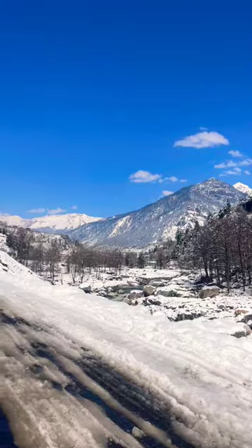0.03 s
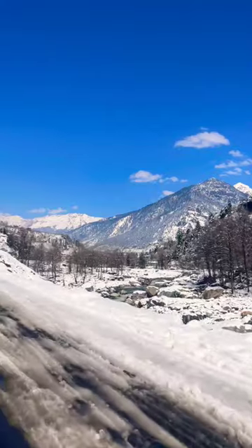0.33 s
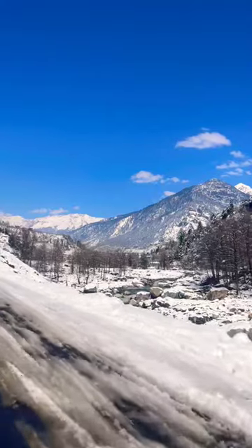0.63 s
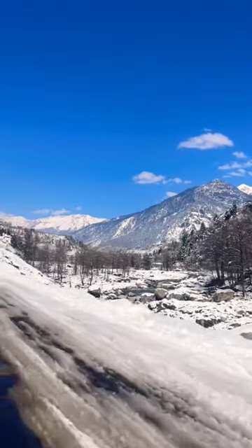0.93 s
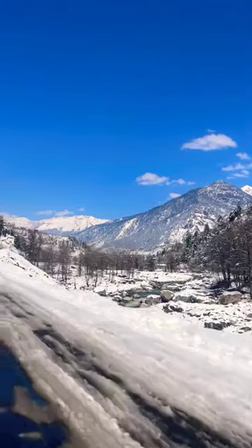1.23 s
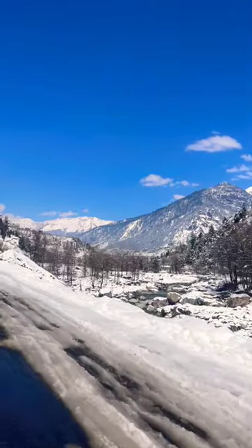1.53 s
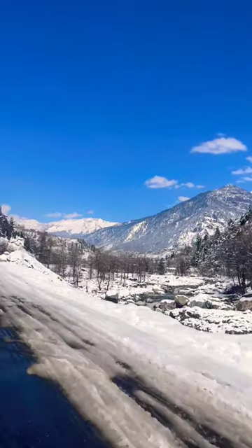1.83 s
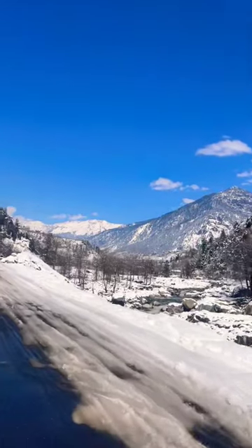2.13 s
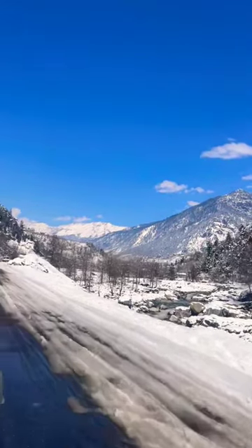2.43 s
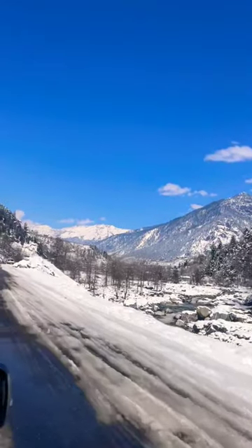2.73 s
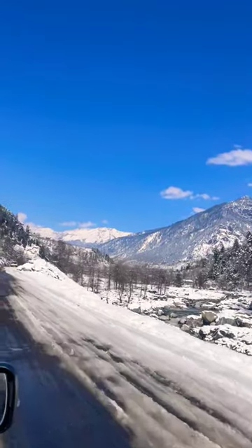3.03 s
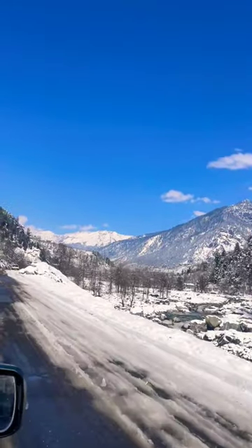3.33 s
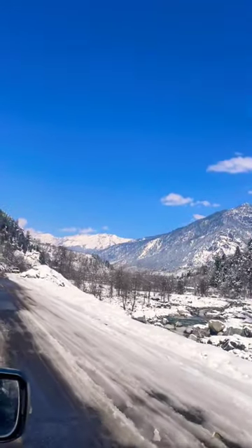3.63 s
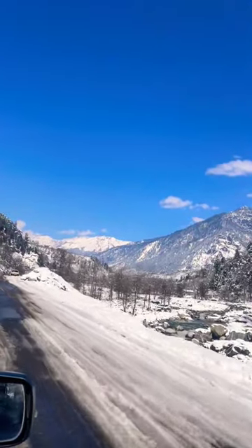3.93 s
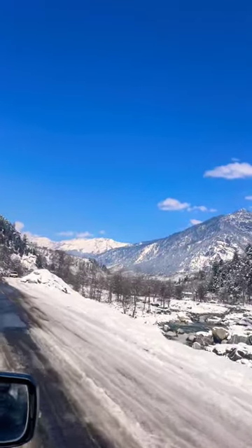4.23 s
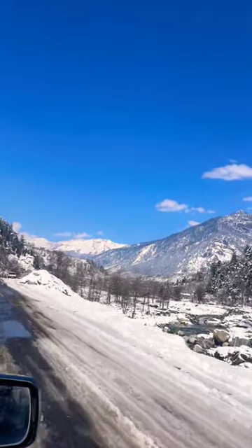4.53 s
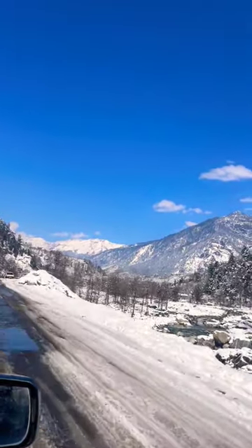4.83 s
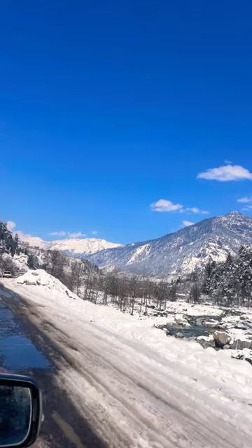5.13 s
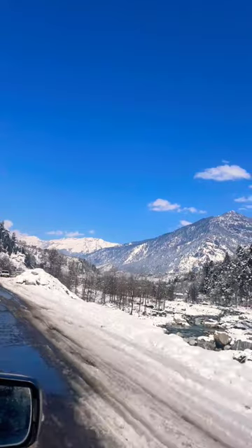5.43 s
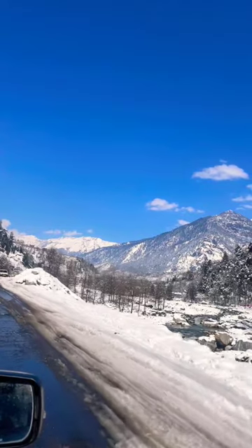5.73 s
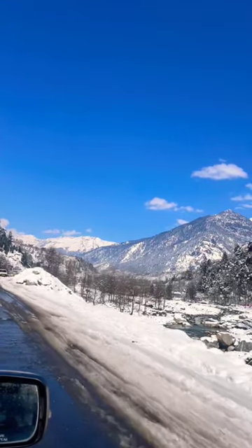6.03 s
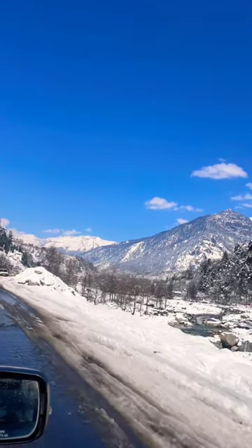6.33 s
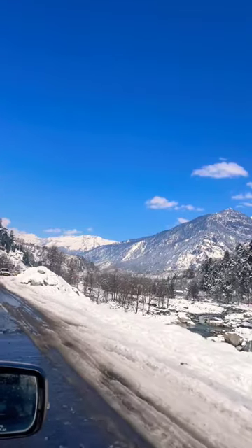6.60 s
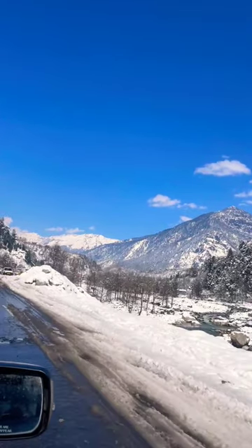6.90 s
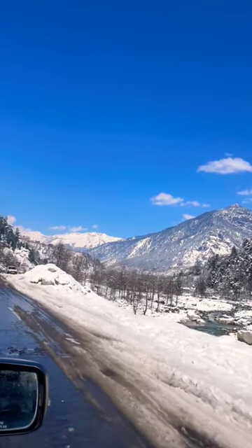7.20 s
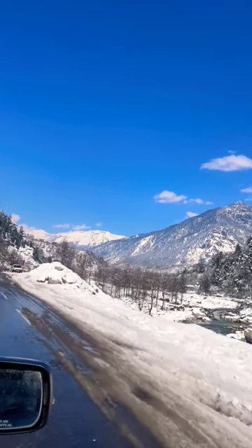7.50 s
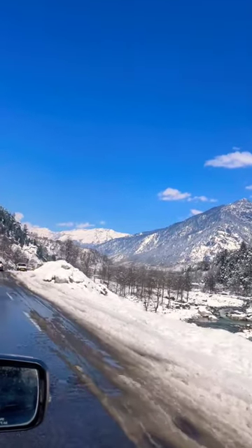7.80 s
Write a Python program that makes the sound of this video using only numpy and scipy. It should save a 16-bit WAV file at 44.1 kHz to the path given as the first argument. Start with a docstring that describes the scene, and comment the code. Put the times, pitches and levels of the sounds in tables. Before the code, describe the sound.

Wind rumbles, flutters and thumps on the microphone while a car drives along a wet, slushy road, its tyres swishing underneath.

```python
"""Wind at a car window on a slushy road

A phone is held at the open window of a car driving along a wet mountain road. Wind rumbles,
flutters and drops away on its two microphone ports; single eddies thump or crack as they sweep past.
Underneath, the engine drones, the tyres roar and the slush they throw up hisses and spatters."""
import sys
import numpy as np
from scipy import signal
from scipy.fft import rfft, irfft
from scipy.io import wavfile
from scipy.ndimage import uniform_filter1d

SR = 44100
rng = np.random.default_rng(int(sys.argv[2]) if len(sys.argv) > 2 else 0)


def transcribe(signal):
    """Save signal, clipped to [-1, 1], as a 16-bit WAV file at the path in sys.argv[1]."""
    frames = np.atleast_2d(signal).T
    limited = np.clip(frames, -1, 1)
    pcm = np.round(limited * 32767).astype(np.int16)
    wavfile.write(sys.argv[1], SR, pcm)


N = 346626
TIME = np.arange(N) / SR
FREQS = np.fft.rfftfreq(N, 1 / SR)

# gusts that hit the microphone head-on: t/s, leading eddy/dB, its pitch/Hz, buffet/dB, rumble/dB
GUSTS = [(0.182, -7.5, 119, -30, -14), (0.301, -35, 320, -30, -31), (0.39, -18.5, 304, -30.5, -22.5),
         (0.645, -14, 370, -27, -34), (0.922, -23, 406, -30, -34), (0.945, -25, 368, -31.5, -34),
         (1.046, -20, 450, -32, -36), (1.061, -14, 345, -28.5, -19.5), (1.12, -13.5, 325, -39, -32),
         (1.154, -20, 398, -26.5, -37), (1.334, -24, 400, -33, -30), (1.393, -10, 290, -24.5, -18),
         (1.44, -16.5, 250, -28, -22), (1.469, -9, 385, -34, -21), (1.636, -16.5, 327, -30.5, -42),
         (1.678, -21.5, 414, -41, -37), (1.708, -20, 473, -31, -20.5), (1.745, -21, 248, -37, -25),
         (1.783, -13, 577, -36, -32), (1.789, -16, 338, -31, -34), (1.817, -11.5, 467, -25.5, -32),
         (1.853, -22, 420, -46, -24), (1.881, -10.5, 385, -25, -30), (1.986, -21, 480, -43, -30),
         (2.007, -10.5, 224, -31, -22), (2.085, -16.5, 420, -46, -34), (2.116, -8.5, 386, -26, -34),
         (2.13, -7, 347, -26.5, -23), (2.21, -25, 450, -35, -26), (2.367, -19, 347, -33, -18),
         (2.403, -24, 400, -31.5, -34), (2.439, -16, 796, -32, -23), (2.534, -13.5, 427, -30.5, -19),
         (2.576, -20, 523, -30, -20), (2.631, -12, 390, -23, -38), (2.708, -14.5, 383, -26, -19),
         (2.732, -10, 280, -28, -31), (2.749, -13, 448, -33, -40), (2.795, -12.5, 445, -25, -38),
         (2.847, -20, 450, -35, -25), (2.898, -14, 310, -28.5, -35), (3.025, -15.5, 367, -28.5, -21),
         (3.099, -19, 448, -31, -30), (3.127, -14.5, 300, -23.5, -30), (3.206, -14, 400, -38, -20),
         (3.241, -19, 395, -34, -36), (3.281, -17, 420, -28, -18.5), (3.367, -10, 580, -27, -33),
         (3.5, -26, 420, -38, -18), (3.541, -20, 397, -33, -42), (3.623, -11, 360, -28, -14),
         (3.762, -21, 406, -31, -24), (3.788, -13.5, 460, -36, -20), (3.805, -18, 430, -32, -32),
         (3.887, -14.5, 347, -29.5, -25), (3.947, -23, 350, -30, -39), (4.019, -20, 400, -35, -42),
         (4.058, -22, 340, -27.5, -28), (4.122, -24, 240, -41, -30), (4.165, -20, 400, -39, -27),
         (4.184, -21, 423, -28, -26), (4.355, -16, 393, -34, -33), (4.489, -20, 385, -30.5, -28),
         (4.55, -18.5, 260, -35, -31), (4.607, -19, 376, -30, -29), (4.631, -9, 396, -39, -16.5),
         (4.649, -9, 296, -31, -26), (4.663, -10, 400, -28, -28), (4.817, -18.5, 360, -32, -18.5),
         (4.858, -13.5, 454, -27, -36), (4.894, -22, 400, -31, -18.5), (4.954, -28, 414, -28.5, -23),
         (5.151, -12, 377, -27, -18.5), (5.214, -18, 280, -27, -25), (5.379, -19.5, 240, -42, -32),
         (5.474, -15.5, 454, -32, -25), (5.54, -17, 398, -34, -35), (5.552, -10, 410, -26, -31),
         (5.585, -13, 360, -46, -30), (5.692, -19.5, 280, -47, -30), (5.794, -13, 313, -29, -23.5),
         (5.887, -20, 238, -43, -22), (5.96, -17, 384, -29, -34), (5.977, -13, 290, -31, -24),
         (6.093, -17, 216, -40, -35), (6.225, -16, 260, -37, -23.5), (6.286, -15, 493, -39, -35),
         (6.298, -17.5, 350, -31, -23), (6.358, -19, 385, -38, -43), (6.473, -16, 223, -37, -27),
         (6.518, -19, 400, -31.5, -24), (6.769, -19.5, 400, -50, -43), (7.099, -17.5, 333, -27.5, -27),
         (7.128, -14, 380, -29, -28), (7.612, -18, 250.5, -34, -20.5), (7.646, -13, 300, -30.5, -22),
         (7.771, -13.5, 280, -28.5, -24), (7.793, -21, 357, -37, -32)]


def wind():
    """Rumble and buffeting swell in gusts on both ports; side swirls flutter between the two."""
    airflow = [(.2, -36.5), (.8, -32), (1.5, -24.5), (2.3, -30.5), (2.65, -35), (3.0, -25.5), (3.7, -30.5),
               (4.1, -26.5), (4.8, -29), (5.3, -35), (6.05, -28), (6.8, -31.5), (7.5, -32), (7.86, -29)]  # the stream past the window between gusts: t/s, level/dB
    swirls = [(.21, -22), (.42, -24.5), (.72, -27), (1.03, -32), (1.19, -26), (1.37, -22), (1.44, -27),
              (1.53, -29), (1.74, -24), (1.91, -31), (2.0, -30), (2.29, -30), (2.43, -22.5), (2.57, -26),
              (2.74, -25), (2.88, -22), (3.0, -27), (3.16, -25), (3.32, -25), (3.71, -24), (3.83, -26),
              (4.0, -28), (4.11, -23), (4.27, -26), (4.5, -29), (4.711, -27), (5.381, -29), (5.91, -30),
              (6.1, -30), (6.47, -29), (7.21, -30), (7.359, -28)]  # swirls from the side: t/s, level/dB
    rumble_eq = [(15, -30), (28, -35), (42, -2.5), (58, 1), (80, -2), (110, -5), (160, -13), (300, -37),
                 (600, -105)]  # large, slow eddies: f/Hz, level/dB
    buffet_eq = [(50, -33), (110, -8), (170, 1.5), (250, -0.5), (420, -6.5), (700, -21), (1200, -24),
                 (2200, -42)]  # mid-sized eddies: f/Hz, level/dB
    flutter_eq = [(25, -15), (65, 7), (120, 0), (380, 1), (600, 0.5), (850, -7), (1050, -3), (1350, -14),
                  (2000, -16), (4000, -50)]  # churn between the ports: f/Hz, level/dB
    air_db, = curves(airflow)
    front_db = air_db + lulls_db()
    side_db = air_db.mean() + 0.73 * (air_db - air_db.mean())
    # small eddies arrive first and the large, slow ones trail behind
    times, _, _, buffet_db, rumble_db = np.transpose(GUSTS)
    buffet_power = swells(times, buffet_db + 1.5, lag_s=0.0023, rise_s=0.016, fall_s=0.008)
    rumble_power = swells(times, rumble_db - 3.06, lag_s=0.0055, rise_s=0.0094, fall_s=0.051)
    swirl_times, swirl_db = np.transpose(swirls)
    swirl_power = swells(swirl_times, swirl_db - 2, lag_s=0.0028, rise_s=0.023, fall_s=0.028)
    rumble_level = gusting(front_db - 2, rumble_power, lump_hz=25.5)
    buffet_level = gusting(front_db - 7, buffet_power, lump_hz=16.4)
    flutter_level = gusting(side_db - 6.5, swirl_power, lump_hz=9.6)
    rumble = steadied(coloured(rng.standard_normal(N), rumble_eq), 0.055) * rumble_level
    buffet = steadied(coloured(swarm(per_s=700, spread_db=5.5), buffet_eq), 0.083) * buffet_level
    shared = rumble + buffet + tearing(buffet_level)
    churn = swarm(per_s=1100, spread_db=0) + .5 * rng.standard_normal(N)
    flutter = steadied(coloured(churn, flutter_eq), 0.025) * flutter_level
    return np.array([shared + flutter, shared - flutter])


def gusting(stream_db, gust_power, lump_hz):
    """Wind envelope: gusts ride on a lumpy stream that dips freely but swells only so far."""
    lumps_db = 5 * np.minimum(wander(lump_hz), 1.26)
    return np.sqrt(gain_of(stream_db + lumps_db) ** 2 + gust_power)


def lulls_db(width_s=0.017, slack_db=-4):
    """The air drops away from the microphone for a moment, and slackens just before each gust."""
    lulls = [(.36, -10), (.73, -23), (.84, -5), (1.23, -3), (1.42, -12), (1.495, -1), (1.6, -6),
             (1.93, -16), (2.05, -10), (2.28, -21), (2.5, -6), (2.67, 3), (2.93, -4), (3.0, -4),
             (3.18, -12), (3.45, -15), (3.91, -14), (4.0, -6), (4.3, -8), (4.4, 1.5), (4.76, -6),
             (5.02, -9), (5.07, -7), (5.27, -5), (5.53, -6), (5.62, -6), (5.85, -4), (5.93, 0), (6.19, 0),
             (6.255, -6), (6.34, -14), (6.4, -5), (6.67, -13), (6.8, -20), (6.92, -4), (7.52, -8)]  # dips in the airflow, and the odd lift: t/s, change/dB
    dips_db = sum(db * np.exp(-((TIME - s) / width_s) ** 2) for s, db in lulls)
    times = np.transpose(GUSTS)[0]
    before_gust = swells(times, np.zeros(len(times)), lag_s=-0.0457, rise_s=0.0037, fall_s=0.0045)
    return dips_db + slack_db * np.minimum(before_gust, 1)


def tearing(buffet_level, steepness=2.28):
    """Hard gusts break into smaller eddies, so they sound brighter."""
    tearing_eq = [(250, -20), (480, -12), (700, -0.5), (950, -10), (1250, -11), (2200, -19)]  # small eddies: f/Hz, level/dB
    texture = steadied(coloured(swarm(per_s=1600, spread_db=-2.5), tearing_eq), 0.047)
    return texture * gain_of(-37) * (buffet_level / gain_of(-24)) ** steepness


def thumps(lean=0.25, trail_hz=145, trail_s=0.00861, scatter=0.31):
    """A quick eddy leads each gust and a slow one trails it, both a little nearer one port."""
    out = np.zeros((2, N))
    for s, db, hz, buffet_db, _ in GUSTS:
        phase, trail_phase, side, girth = rng.random(4)
        stretch = np.exp(scatter * (2 * girth - 1))  # a larger trailing eddy is lower and later
        lead = gain_of(db - 3.5) * eddy(hz, phase, cycles=0.75, slowing=0.36)
        trail = 2 * gain_of(buffet_db + 2) * eddy(trail_hz / stretch, trail_phase, slowing=0.48)
        start = s - len(lead) / SR / 2
        for port, sign in zip(out, (1, -1)):
            share = 1 + sign * lean * (2 * side - 1)
            add(port, start, lead * share)
            add(port, start + trail_s * stretch, trail * share)
    return out


def lone_eddies(thud_hz=85):
    """The sharpest vortices crack as they break on the ports; the largest pass as a deep thud."""
    cracks = [(1.389, -20, 820), (1.467, -14.5, 750), (1.882, -27, 850), (2.002, -22, 900),
              (2.127, -19, 740), (2.706, -24, 930), (2.749, -25, 1090), (2.793, -22, 935),
              (3.367, -23, 940), (5.552, -32, 800)]  # sharp eddies: t/s, peak/dB, f/Hz
    thuds = [(0.201, -12), (.301, -20.5), (0.656, -15), (1.572, -18.5), (2.237, -15), (2.317, -17.5),
             (2.462, -15), (2.586, -16), (2.826, -20), (2.862, -14), (2.961, -21), (3.137, -14),
             (3.222, -14), (3.334, -20.5), (3.708, -15), (3.854, -18), (4.557, -26), (5.493, -15.5),
             (5.816, -21.5), (6.043, -17), (7.038, -17)]  # large, slow eddies: t/s, peak/dB
    vortices = [(s, db, hz, 1.15) for s, db, hz in cracks] + [(s, db, thud_hz, .8) for s, db in thuds]
    out = np.zeros(N)
    for s, db, hz, cycles in vortices:
        sound = gain_of(db) * eddy(hz, rng.random(), cycles, slowing=0.31)
        add(out, s - len(sound) / SR / 2, sound)
    return out


def swarm(per_s, spread_db, bands=24):
    """Turbulence: random eddies of all sizes, the small, high ones more often."""
    out = np.zeros(N)
    for hz in np.geomspace(110, 1200, bands):
        hits = rng.random(N) < per_s * np.sqrt(hz / 400) / bands / SR
        strengths = gain_of(spread_db * np.clip(rng.standard_normal(N), -2, 1.5))
        out += signal.oaconvolve(hits * strengths, eddy(hz, rng.random()) * np.sqrt(hz), 'same')
    return evened(out)


def eddy(hz, phase, cycles=0.57, slowing=0.45):
    """A vortex at the port, centred in 60 ms: a few pressure swings, each longer than the last."""
    t = np.arange(-.03, .03, 1 / SR)
    turns = np.log(np.maximum(1 + slowing * hz * t, 1e-3)) / slowing
    envelope = np.exp(-.5 * (turns / cycles) ** 2) * signal.windows.tukey(len(t))
    return envelope * np.cos(2 * np.pi * (turns + phase))


def engine(waver=0.0043, rough_db=3, whine_hz=467):
    """A rough, low drone on the firing rate and its multiples, and a faint whine from the drive."""
    running = [(.17, 59, -29.5, -60), (.8, 58.87, -30.5, -60), (1.4, 59.66, -37, -50), (3, 60.5, -42, -46),
               (4.5, 59.5, -34.5, -48.5), (6.2, 58.3, -41.5, -61), (6.5, 58.4, -39, -41.5),
               (7.3, 60.34, -32, -46), (7.86, 61, -32, -41)]  # the engine's run: t/s, firing rate/Hz, drone/dB, whine/dB
    harmonics = [(1, -5), (2, 3), (3, -9.5), (4, -9.5), (6, -18)]  # the drone's partials: multiple of the firing rate, level/dB
    firing_hz, drone_db, whine_db = curves(running)
    turns = np.cumsum(firing_hz * (1 + waver * wander(4.57))) / SR
    drone = np.zeros(N)
    for order, db in harmonics:
        strength = gain_of(db + rough_db * wander(16))
        drone += strength * np.sin(2 * np.pi * (order * turns + rng.random()))
    whine_turns = np.cumsum(whine_hz * (1 + 0.0223 * wander(23.8))) / SR
    whine = np.sin(2 * np.pi * whine_turns) * gain_of(4 * wander(8.2))
    return evened(drone) * gain_of(drone_db) + evened(whine) * gain_of(whine_db)


def tyres():
    """The tyres roar, their tread sings, and they squeeze out water and fling up spray and slush."""
    wet_road = [(.2, -40.5, -61, -57), (.48, -41.5, -48, -58), (.7, -40.5, -48, -56), (1.05, -40, -46, -58),
                (1.15, -41, -49, -59), (1.7, -40.5, -50, -58), (2.85, -40.5, -48, -62),
                (3.05, -42.5, -51.5, -62.5), (3.5, -41.5, -57, -60), (3.9, -42, -50.5, -64),
                (4.15, -43.5, -51, -66), (4.62, -43.5, -50.5, -65), (4.9, -41.5, -51, -59),
                (5.45, -42, -48.5, -58.5), (5.88, -43, -43, -56.5), (6.45, -42.5, -45, -60.5),
                (6.74, -41.5, -48.5, -55.5), (6.92, -42.5, -53, -65), (7.4, -44.5, -53.5, -67),
                (7.86, -49, -56, -71)]  # the wheels, by how wet the road is: t/s, roar/dB, swish/dB, spray/dB
    puddles = [(.63, -45, -64), (1.05, -43, -67), (3.81, -40.5, -61), (4.29, -39.5, -52.5),
               (4.35, -42.5, -56), (4.82, -44, -57), (5.03, -64, -61), (5.13, -63, -57), (5.78, -49, -53),
               (5.86, -58, -54), (6.04, -42.5, -77)]  # puddles and ridges of slush: t/s, roar/dB, spray/dB
    surface = [(.2, -79), (1, -45), (1.8, -44.5), (2.4, -40), (2.8, -37.5), (3.5, -41), (4.2, -45),
               (5.5, -43.5), (6.5, -47.5), (7.86, -47.5)]  # the tread's song, by the surface it rolls on: t/s, level/dB
    roar_eq = [(20, -15), (60, 17.5), (200, 3), (450, 7), (700, 7), (1020, 7), (1400, 1), (1900, 1.5),
               (2700, 1.5), (3150, -2.5), (4200, -9.5), (5600, -11.5), (9000, -40)]  # rolling roar: f/Hz, level/dB
    tread_eq = [(500, -17), (780, -12), (920, 0), (1100, 0.5), (1220, -5.5), (1400, -6), (2200, -36.5)]  # tread hum near 1 kHz: f/Hz, level/dB
    swish_eq = [(1500, -10), (2900, 3.5), (4000, 1.5), (5500, 0), (6400, -1), (8500, -14), (15000, -15)]  # water squeezed from under the tyres: f/Hz, level/dB
    spray_eq = [(2000, -42), (5000, 1.5), (7500, -2.5), (9000, 2), (11000, -1.5), (13500, -6),
                (15500, -4.5)]  # fine droplets: f/Hz, level/dB
    roar_db, swish_db, spray_db = curves(wet_road)
    tread_db, = curves(surface)
    times, puddle_roar_db, puddle_spray_db = np.transpose(puddles)
    roar_db = with_puddles(roar_db, times, puddle_roar_db)
    spray_db = with_puddles(spray_db, times, puddle_spray_db)
    roar_noise, tread_noise, swish_noise, spray_noise = rng.standard_normal((4, 2, N))
    roar = coloured(roar_noise + 0.52 * droplets(per_s=1100, spread_db=3), roar_eq)
    roar = patchy(roar, depth_db=2.25) * gain_of(roar_db + 7 + 0.71 * wander(24))
    tread = coloured(tread_noise, tread_eq) * gain_of(tread_db)
    swish = coloured(swish_noise + 0.5 * droplets(per_s=1300, spread_db=1.5), swish_eq)
    swish = patchy(swish, depth_db=5) * gain_of(swish_db)
    spray = coloured(spray_noise + droplets(per_s=5000, spread_db=1), spray_eq)
    spray *= gain_of(spray_db + 5 + 0.89 * wander(44))
    return stereo_width(roar + tread + swish + spray + splats())


def with_puddles(road_db, times, puddle_db):
    """The road's level in dB, surging as the tyres plough through each puddle."""
    surges = swells(times, puddle_db, lag_s=0.0026, rise_s=0.027, fall_s=0.028)
    return 10 * np.log10(gain_of(road_db) ** 2 + surges)


def droplets(per_s, spread_db):
    """Two trains of tiny impacts, a few of them large."""
    sizes = gain_of(spread_db * np.minimum(rng.exponential(1, (2, N)), 4))
    return evened(sizes * rng.standard_normal((2, N)) * (rng.random((2, N)) < per_s / SR))


def splats(slap_s=0.011, band_ratio=1.27):
    """Each lump of slush lands with a bright tick and a duller, longer slap, lower for a larger lump."""
    lumps = [(0.629, -60, -27, 0.0036, 2170), (0.86, -49, -31, .006, 2210), (1.745, -54, -33, .004, 2200),
             (1.757, -44, -51, .004, 3000), (2.171, -45, -50, .008, 3000), (2.735, -50, -37, .004, 2200),
             (3.806, -60, -31, .004, 2100), (4.801, -45, -53, .005, 3000), (5.09, -35.5, -44, .0025, 4000),
             (5.436, -46, -37, .005, 2200), (5.78, -43, -56, .009, 3000), (5.906, -43, -50, .005, 3000),
             (6.49, -60, -29, .004, 1280), (6.494, -47, -37, .004, 4250), (6.709, -45, -41, .006, 2200),
             (6.789, -50, -45, .006, 2200)]  # slush landing close by: t/s, tick/dB, slap/dB, tick decay/s, slap pitch/Hz
    tick_eq = [(3000, -20), (7000, 3), (10000, 0), (13500, 0), (15500, -8)]  # the bright tick: f/Hz, level/dB
    tick_envelope, slaps = np.zeros(N), np.zeros((2, N))
    t = np.arange(SR // 10) / SR
    for s, tick_db, slap_db, tick_s, hz in lumps:
        add(tick_envelope, s, gain_of(tick_db) * np.exp(-t / tick_s))
        band = signal.butter(2, [hz / band_ratio, hz * band_ratio], 'band', fs=SR, output='sos')
        for port in slaps:
            wet_noise = evened(signal.sosfilt(band, rng.standard_normal(len(t))))
            add(port, s, gain_of(slap_db) * np.exp(-t / slap_s) * wet_noise)
    return coloured(rng.standard_normal((2, N)), tick_eq) * tick_envelope + slaps


def stereo_width(pair):
    """Sets the stereo width of the tyre noise: left and right in step or opposed, by pitch."""
    likeness = [(100, 1), (400, 0.061), (950, -0.36), (1450, 0.024), (1950, 1), (2450, 0.34), (3100, -0.67),
                (4000, 0.33), (4800, 0.35), (5300, 0.92), (6200, 0.084), (6700, -0.5), (7000, -2.64),
                (7750, -1.9), (8000, 1), (8900, 0.0022), (9600, 0.28), (10600, -0.012), (11600, .4),
                (12900, 0.88), (14000, 0), (14800, -0.93)]  # stereo image: f/Hz, likeness (+ in step, - opposed)
    alike = np.clip(across(likeness), -.97, .97)
    shared, opposed = irfft(rfft(pair) * np.sqrt([(1 + alike) / 2, (1 - alike) / 2]), N)
    return np.array([shared + opposed, shared - opposed])


def hollowed(pair, half_width_hz=140, depth=0.95):
    """What both ports share dips briefly in one narrow midrange band."""
    hollows = [(0.75, 613, 0.042), (1.195, 780, 0.022), (2.245, 750, 0.047), (2.89, 755, 0.022),
               (5.39, 800, 0.027)]  # passing notches: t/s, f/Hz, half length/s
    shared, lost = rfft(pair.mean(0)), np.zeros(N)
    for s, hz, half_s in hollows:
        band = irfft(shared * np.exp(-((FREQS - hz) / half_width_hz) ** 4), N)
        lost += band * np.exp(-((TIME - s) / half_s) ** 4)
    return pair - depth * lost


def patchy(x, depth_db, frames=7, bins=5):
    """Makes noise flicker in patches some 40 ms long and 200 Hz wide, with the swells capped."""
    framing = dict(nperseg=1024, noverlap=768)
    spectra = signal.stft(x, **framing)[2]
    patches = uniform_filter1d(rng.standard_normal(spectra.shape[1:]), bins, axis=0)
    patches = uniform_filter1d(patches, frames, axis=1)
    flicker = gain_of(depth_db * np.minimum(evened(patches), 2))
    return evened(signal.istft(spectra * flicker, **framing)[1][:, :N])


def swells(times, levels_db, lag_s, rise_s, fall_s):
    """The power of events that share one shape: each peaks lag_s from its time, then falls."""
    t = np.arange(-SR // 4, SR // 4) / SR
    bell = np.exp(-(t / np.where(t < 0, rise_s, fall_s)) ** 2)
    power = np.zeros(N + SR)
    for s, db in zip(times, levels_db):
        add(power, s + lag_s, gain_of(db) ** 2 * bell)
    return power[SR // 4:][:N]


def steadied(x, seconds):
    """Holds the rms over that many seconds at 1 and keeps the quicker lumps."""
    window = np.hanning(int(seconds * SR))
    power = signal.fftconvolve(x ** 2, window / window.sum(), 'same')
    return x / np.sqrt(abs(power) + 1e-6)


def wander(hz):
    """Random drift of rms 1 that moves up to about hz times a second."""
    return evened(irfft(rfft(rng.standard_normal(N)) / (1 + (FREQS / hz) ** 4), N))


def coloured(x, eq):
    """Shapes x with an EQ curve, at rms 1."""
    return evened(irfft(rfft(x) * gain_of(across(eq)), N))


def across(points):
    """A table over log frequency, at every bin."""
    hz, value = np.transpose(points)
    return np.interp(np.log(FREQS + 1), np.log(hz + 1), value)


def curves(rows):
    """Each column of a table over time, at every sample."""
    times, *columns = np.transpose(rows)
    return [np.interp(TIME, times, column) for column in columns]


def add(mix, s, sound):
    """Mixes a sound in at time s."""
    part = mix[max(round(s * SR), 0):][:len(sound)]
    part += sound[:len(part)]


def gain_of(db):
    """Decibels to a factor."""
    return 10 ** (np.asarray(db) / 20)


def evened(x):
    """Scales to rms 1."""
    return x / np.sqrt(np.mean(x ** 2) + 1e-20)


def scene():
    """Wind on the microphone over the sound of the moving car."""
    return hollowed(wind() + thumps() + lone_eddies() + engine() + tyres())


def record(dry, low_cut_hz=23, high_cut_hz=15600, start_s=.174, fade_s=0.0009):
    """The microphone sheds the deepest wind; the sound cuts in sharply and loses its highest treble."""
    heard = irfft(rfft(dry) * (1 - 1 / (1 + (FREQS / low_cut_hz) ** 4)), N)
    opened = heard * np.clip((TIME - start_s) / fade_s, 0, 1)
    low_pass = signal.firwin(511, high_cut_hz, window=("kaiser", 9), fs=SR)
    return signal.oaconvolve(opened, low_pass[None], "same")


dry = scene()
out = record(dry)
transcribe(out)
```